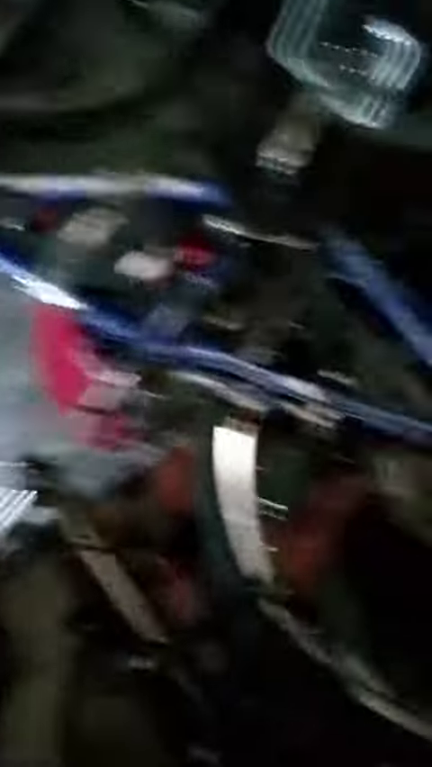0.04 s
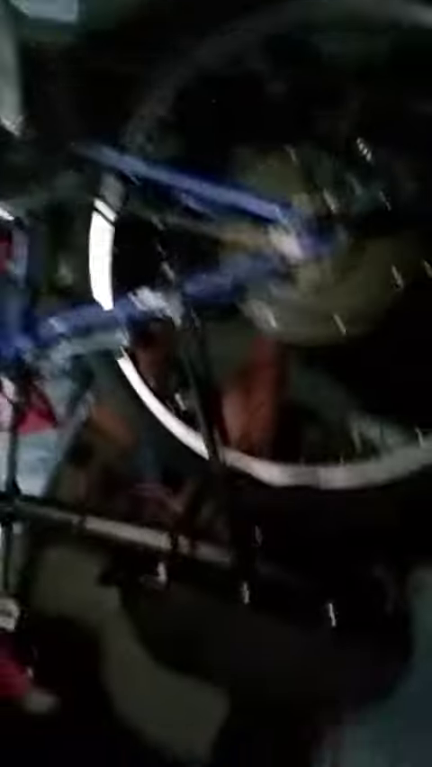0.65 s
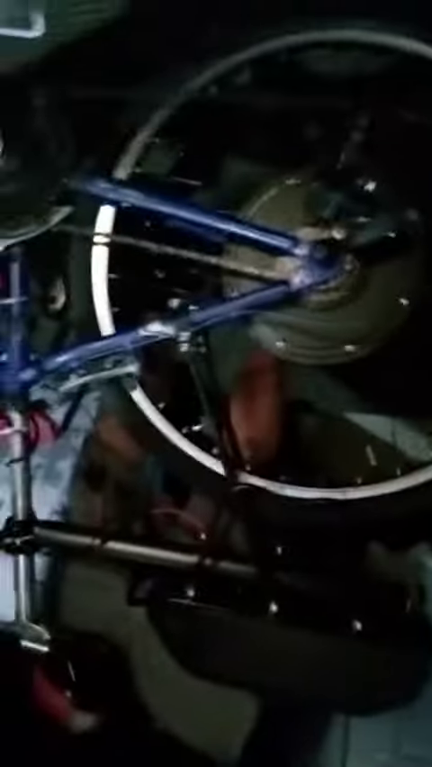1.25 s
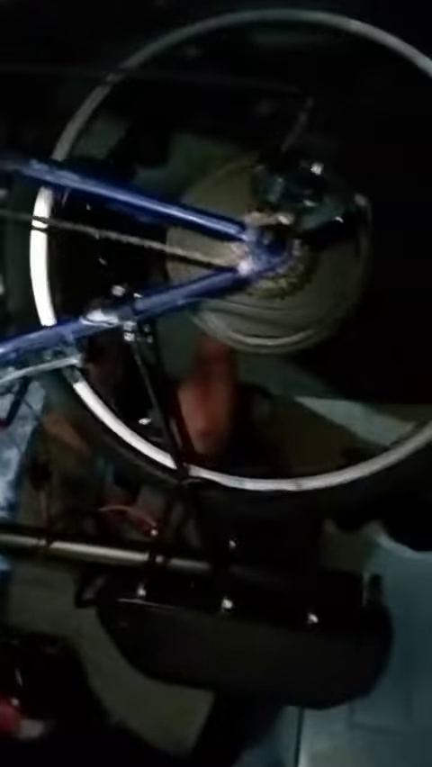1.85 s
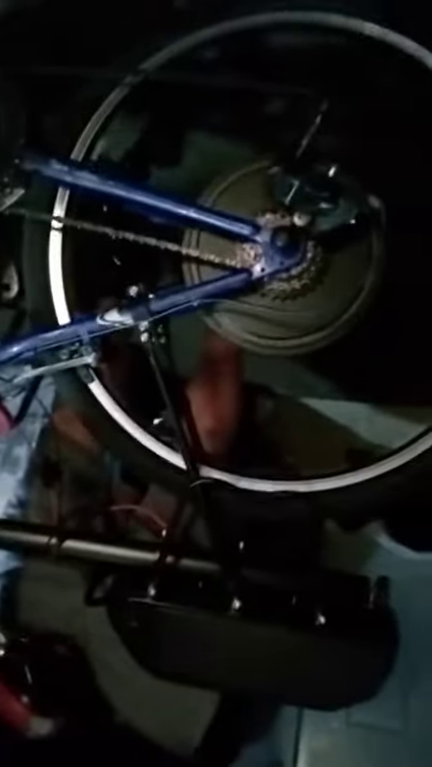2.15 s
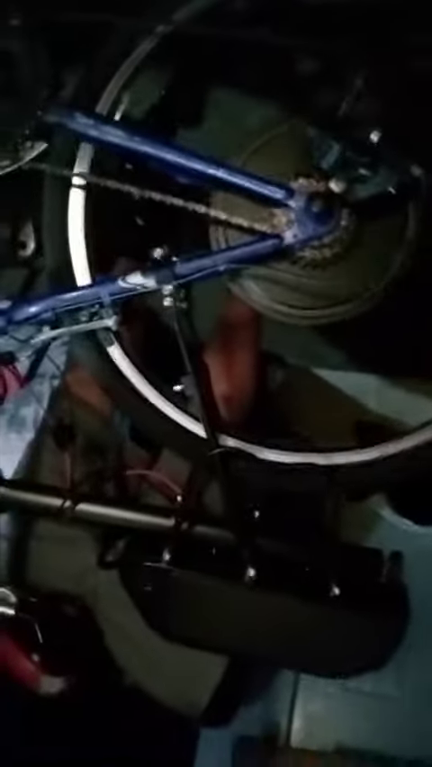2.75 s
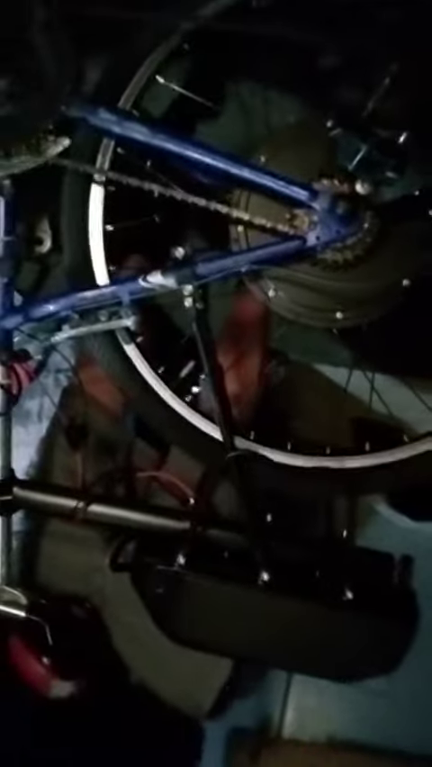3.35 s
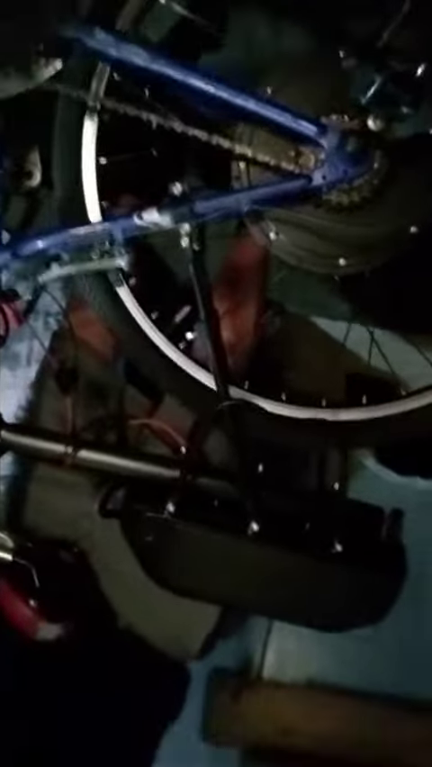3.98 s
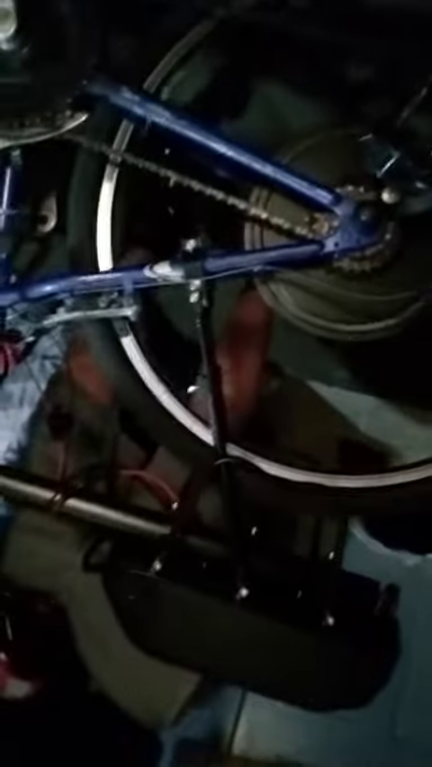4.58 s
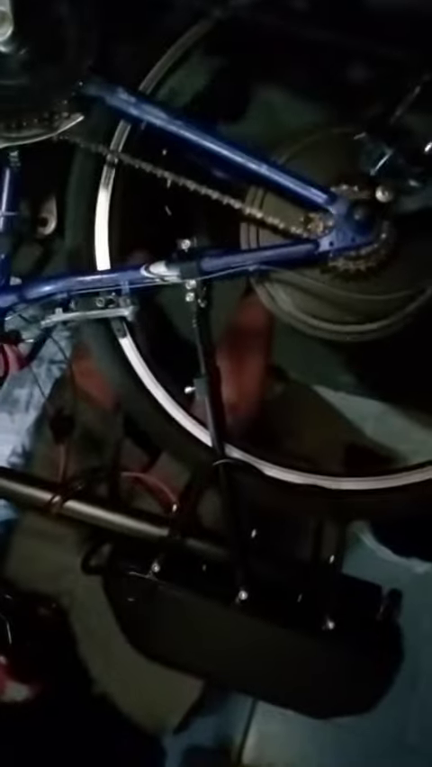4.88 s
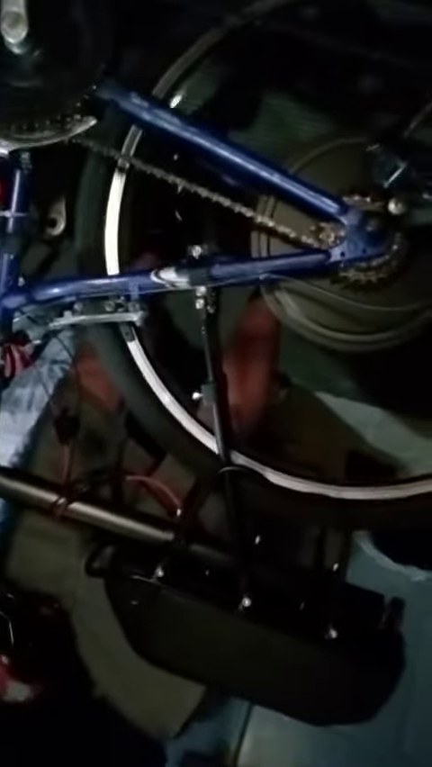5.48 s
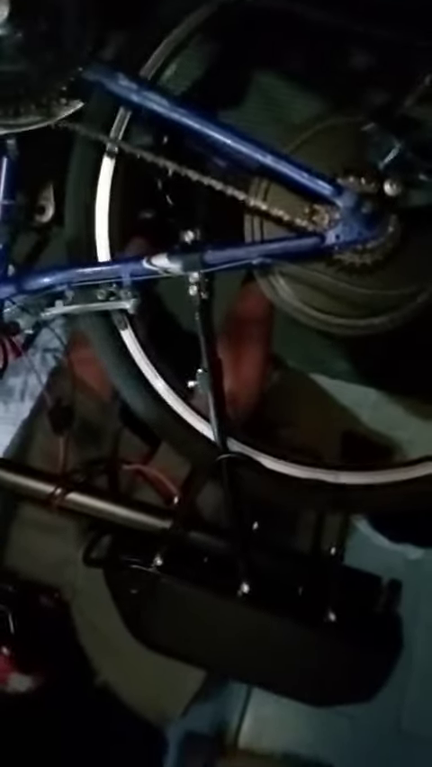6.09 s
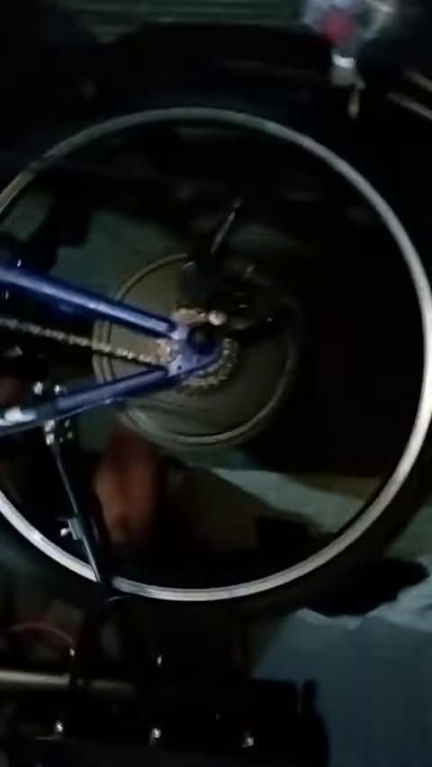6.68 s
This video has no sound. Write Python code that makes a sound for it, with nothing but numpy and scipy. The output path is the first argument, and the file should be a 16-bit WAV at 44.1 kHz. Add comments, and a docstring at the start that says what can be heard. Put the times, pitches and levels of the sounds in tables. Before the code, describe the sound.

A bicycle's geared hub motor is heard close up in a small room. It opens with quiet room tone, faint rustling and a sharp click at 0.5 seconds. Around 1.6 seconds a low hum and a very faint high whistle begin, and gear teeth tick one by one. By 1.9 seconds they merge into a loud, harsh, ringing metallic rattle over a light rumble. It speeds up until 2.3 seconds, then slows into separate ticks and stops at 3 seconds. A sharp knock with a dull bump follows immediately, then small clicks between 3.6 and 4.1 seconds. At 4.5 seconds the hum and ticking return, building into the same rattling drone, faster this time. It holds from about 4.9 to 5.8 seconds, then gradually slows, still rattling at the end, near 6.7 seconds.

```python
"""Small room: a bicycle's geared hub motor, wheel off the ground, is run up twice.
Gear teeth strike one by one, then merge into a harsh rattling drone that rings in hub shell and spokes.
Torque changes set the frame humming; the controller whistles faintly under power.
Handling adds clicks, dull bumps and a faint rustle over the room tone."""
import sys
import numpy as np
from scipy import signal
from scipy.fft import rfft, irfft
from scipy.io import wavfile

SR = 44100
rng = np.random.default_rng(int(sys.argv[2]) if len(sys.argv) > 2 else 0)


def wav_record(signal):
    """Record a signal, one row per channel, as 16-bit PCM in the file named by sys.argv[1]."""
    frames = np.transpose(np.atleast_2d(signal))
    bounded = np.clip(frames, -1, 1)
    # unit amplitude maps onto the largest positive 16-bit level
    quanta = np.round(bounded * 32767).astype(np.int16)
    wavfile.write(sys.argv[1], SR, quanta)


N = 296793
TIME_S = np.arange(N) / SR
RUN_SPLIT_S = 3.7   # between the two runs

# tooth rate, one table per run: time_s, rate_hz
TOOTH_RATE = [
    [(1.894, 90), (1.96, 93), (2.05, 105.4), (2.15, 133), (2.24, 147), (2.32, 144), (2.5, 137), (2.68, 118),
     (2.84, 106), (2.918, 95)],
    [(4.686, 95.5), (4.75, 113), (4.83, 148), (4.91, 180), (5.03, 179), (5.25, 188), (5.84, 193),
     (5.95, 175), (6.1, 156), (6.4, 139), (6.73, 118.6)],
]
# tooth force, one table per run: time_s, rattle_db, tick_db
TOOTH_FORCE = [
    [(1.89, -23, -22), (1.97, -17, -21.5), (2.05, -20, -22), (2.15, -15.5, -21), (2.26, -18.5, -19.5),
     (2.33, -20, -21.5), (2.48, -16.5, -19), (2.6, -24, -21.5), (2.75, -18.5, -21.5), (2.82, -21, -23.5),
     (2.88, -17, -18.5), (2.92, -19.5, -26)],
    [(4.68, -16.5, -19.5), (4.72, -16.5, -27), (4.78, -19, -22.5), (4.9, -17, -23), (5.18, -17, -21),
     (5.44, -18, -22), (5.64, -16, -22), (5.8, -18.5, -22), (5.9, -17, -22), (6.15, -17.5, -22.5),
     (6.45, -19, -21.5), (6.73, -18.5, -21)],
]
# single strikes as the wheel starts and stops: start_s, tick_db, rattle_db
SLOW_STRIKES = [(1.703, -3, -31), (1.7402, -5.5, -29.5), (1.767, -5, -21), (1.7911, -10, -20.5),
                (1.8074, -10, -18), (1.8236, -9, -19.5), (1.8401, -4.5, -23), (1.8533, -6, -16),
                (1.8685, -3, -14), (1.8811, -12, -15.5), (2.9232, -8.5, -26), (2.9346, -10, -16),
                (2.9482, -12.5, -18.5), (2.9612, -14, -15.5), (2.9769, -7.5, -31), (2.9939, -7, -33),
                (3.0199, -5.5, -29), (4.5052, -7, -31), (4.5463, -7, -27.5), (4.5691, -11, -24),
                (4.5905, -7, -20), (4.6076, -9, -22.5), (4.6236, -10.5, -20), (4.6388, -10, -24.5),
                (4.6507, -9.5, -22), (4.6637, -12, -18.5), (4.6749, -9, -17)]
# dull wheel and spoke resonances: pitch_hz, width_hz, run1_db, run2_db
WHEEL_MODES = [(379, 47, -20.5, -24), (497, 140, -19.5, -20.5), (659, 210, -15.5, -16),
               (838, 69, -10.5, -10.5), (902.7, 48, -5, -8), (1027, 200, -8, -6), (1133.5, 150, -1.5, -1.5),
               (1271, 200, -2, -3), (1510, 420, -3, -2.5), (1779, 145, -2, -0.5), (1910, 150, -5.5, -4.5),
               (2157, 440, -6, -4.5), (2530, 680, -15.5, -11), (3110, 920, -11, -9.5)]
# bright hub shell resonances: pitch_hz, width_hz, run1_db, run2_db
SHELL_MODES = [(2040, 1500, -8, -9), (3608, 170, -3, 1), (3745, 170, -5.5, -4.5), (4044, 280, -15, -13),
               (4920, 2100, -17, -15), (6634, 480, -6.5, -9), (6950, 220, -8, -6), (8310, 200, -4.5, -2.5),
               (8664, 202, 2.5, -1.5), (8470, 3000, -8, -8), (9720, 900, -16.5, -16),
               (10210, 120, -23, -20.5), (12720, 580, -3.5, -8.5), (13980, 420, -8.5, -5),
               (14750, 800, 0.5, -1.5), (15550, 180, -10.5, -4)]
# wheel rumble spectrum: freq_hz, density_db
RUMBLE_SPECTRUM = [(30, -15.5), (70, -13), (170, -0.5), (300, 5.5), (600, 6.5), (900, -23.5)]
# lowest frame mode, shaken by torque: time_s, level_db
FRAME_HUM = [(0, -75), (1.60, -71), (1.65, -52), (1.665, -41), (1.8, -39), (1.9, -48.5), (2.1, -52),
             (2.25, -65), (2.5, -83), (3.02, -67), (3.08, -45), (3.2, -57.5), (3.5, -76.5), (4.44, -84),
             (4.485, -37), (4.53, -35.5), (4.6, -48), (4.7, -55.5), (5.2, -53), (5.8, -64.5), (6.0, -71),
             (6.73, -63.5)]
# frame bumps: start_s, level_db, pitch_hz, width_hz, t60_s
FRAME_BUMPS = [(0.451, -47, 248, 200, 0.23), (0.615, -56, 227, 60, 0.62), (1.659, -46, 200, 170, .3),
               (3.071, -35, 87.5, 50, 0.12), (4.482, -44, 115, 70, 0.15), (5.87, -53, 100, 120.1, .12)]
# knocks of small parts: start_s, low_db, mid_db, high_db, top_db, t60_s, ring_hz
KNOCKS = [(0.133, -72, -62, -54, -49, 0.017, 14200), (0.519, -69, -33.5, -26, -25, 0.025, 4600),
          (0.646, -78, -63, -44, -41, 0.018, 13500), (1.279, -69, -64, -56, -60, .04, 6500),
          (1.659, -52.5, -37, -56, -54, 0.034, 1720), (3.069, -30, -24.5, -20.5, -37, 0.066, 1970),
          (3.143, -66, -54, -45, -64, .06, 4960), (3.641, -68, -42, -38, -57, .06, 4800),
          (3.666, -58, -38.5, -37.5, -56, 0.06, 1880), (3.706, -45, -41, -36.5, -50, .04, 4340),
          (3.72, -47.5, -46.5, -47, -64, 0.074, 560), (3.955, -55, -27.5, -28.5, -34, .026, 1380),
          (3.973, -58, -50, -51, -56, 0.064, 590), (4.084, -70, -55.5, -54, -62, .06, 2200),
          (4.424, -70, -52, -41, -42, .03, 8400), (4.454, -67, -40.5, -37, -47, 0.078, 14500)]
# limits of the low, mid, high and top bands: edge_hz
KNOCK_EDGES_HZ = [350, 1100, 3000, 8500, 16000]
# controller whistle envelope: time_s, level_db
WHISTLE_LEVEL = [(1.59, -100), (1.605, -51), (1.70, -46), (1.8, -50), (3.0, -55), (3.06, -100),
                 (4.42, -100), (4.455, -51), (4.55, -49), (6.73, -55)]
# rustle envelope: time_s, level_db
RUSTLE_LEVEL = [(0, -53.5), (.3, -57), (.43, -54), (.46, -46), (.485, -48), (.51, -56.5), (.6, -56.5),
                (.88, -54.5), (1.0, -59.5), (1.25, -66), (1.45, -60.5), (1.58, -59.5), (1.62, -54),
                (3.1, -69), (3.25, -60.5), (3.5, -64), (3.62, -60.5), (3.8, -57.5), (4.03, -53.5),
                (4.15, -56), (4.23, -62), (4.4, -55), (6.73, -51)]
# rustle spectrum: freq_hz, density_db
RUSTLE_SPECTRUM = [(400, -19.5), (800, -21.5), (1200, -14.5), (1750, -8.5), (2000, -7.5), (2300, -2.5),
                   (2900, -8.5), (4000, -10), (5200, -14), (6800, -10), (8500, -15), (11000, -21.5),
                   (13500, -17.5), (15500, -16.5)]
# room tone spectrum: freq_hz, density_db
ROOM_SPECTRUM = [(30, -9.5), (70, -6.5), (117, 0), (175, -9), (235, 5.5), (310, -15.5), (420, -13.5),
                 (600, -18.5), (780, -15), (910, -10), (990, -20.5), (2400, -11), (4500, -24.5),
                 (11000, -24.5), (15000, -18.5)]


def gears(lag_s, lag_spread_s):
    """Each tooth ticks on the shell, then rattles the wheel across the gears' play."""
    start_s, rattle_db, tick_db = tooth_strikes(
        jitter_s=.00025, uneven_db=0.5, slow_tick_db=-13.0, slow_rattle_db=-2.0)
    late_s = start_s + lag_s + lag_spread_s * rng.random(len(start_s))
    tick = from_db(4.0) * ring(SHELL_MODES, start_s, tick_db, contact_t60_s=0.0095, scatter_db=2.0)
    rattle = from_db(0.5) * ring(WHEEL_MODES, late_s, rattle_db, contact_t60_s=0.018, scatter_db=2.0)
    return tick, rattle


def tooth_strikes(jitter_s, uneven_db, slow_tick_db, slow_rattle_db):
    """All strikes, slow and spinning: start_s, rattle_db, tick_db."""
    start_s, tick_db, rattle_db = np.transpose(SLOW_STRIKES)
    strikes = [np.array([start_s, rattle_db + slow_rattle_db, tick_db + slow_tick_db])]
    for run, force in zip(TOOTH_RATE, TOOTH_FORCE):
        time_s, teeth = teeth_passed(run)
        start_s = np.interp(np.arange(teeth[-1]), teeth, time_s)
        start_s += jitter_s * rng.standard_normal(len(start_s))
        share_db = -10 * np.log10(curves(run, start_s)[0] / 100)   # faster teeth, less energy each
        share_db += uneven_db * rng.standard_normal(len(start_s))
        rattle_db, tick_db = curves(force, start_s)
        strikes.append(np.array([start_s, rattle_db + share_db, tick_db + share_db]))
    return np.hstack(strikes)


def teeth_passed(run):
    """Tooth rate integrated over one run: time_s, tooth count."""
    time_s = TIME_S[(TIME_S >= run[0][0]) & (TIME_S <= run[-1][0])]
    return time_s, np.cumsum(curves(run, time_s)[0]) / SR


def ring(modes, start_s, level_db, contact_t60_s, scatter_db):
    """Each strike grinds briefly on each resonance, at a strength of its own."""
    out = np.zeros(N)
    for pitch_hz, width_hz, run1_db, run2_db in modes:
        strike_db = level_db + np.where(start_s < RUN_SPLIT_S, run1_db, run2_db)
        strike_db += scatter_db * rng.standard_normal(len(start_s))
        force = bursts(start_s, strike_db, contact_t60_s) * rng.standard_normal(N)
        out += mode(force, pitch_hz, width_hz)
    return out


def cogging(level_db, decay_s):
    """Torque ripples twice a tooth, most under load at the start of a run."""
    ripple = np.zeros(N)
    for run in TOOTH_RATE:
        time_s, teeth = teeth_passed(run)
        load = np.exp(-(time_s - time_s[0]) / decay_s)
        ripple += np.interp(TIME_S, time_s, load * np.sin(4 * np.pi * teeth), left=0, right=0)
    return from_db(level_db) * ripple


def wheel_rumble(level_db):
    """Low noise while the wheel spins."""
    spinning = np.zeros(N)
    for run in TOOTH_RATE:
        start_s, end_s = run[0][0], run[-1][0]
        spinning += np.interp(TIME_S, [start_s - .25, start_s - .1, end_s + .17, end_s + .23], [0, 1, 1, 0])
    return from_db(level_db) * spinning * coloured_noise(RUMBLE_SPECTRUM)


def frame(hum_hz, waver, roughness):
    """The frame hums unsteadily at its lowest mode and thuds when bumped."""
    pitch_hz = hum_hz * (1 + waver * slow_noise(cutoff_hz=9))
    tone = np.sqrt(2) * np.sin(2 * np.pi * np.cumsum(pitch_hz) / SR)
    grain = mode(rng.standard_normal(N), hum_hz, width_hz=60)
    out = from_db(curves(FRAME_HUM)[0]) * unit_rms(tone + roughness * grain)
    for start_s, level_db, bump_hz, width_hz, t60_s in FRAME_BUMPS:
        out += mode(bursts([start_s], [level_db], t60_s) * rng.standard_normal(N), bump_hz, width_hz)
    return out


def knocks(gain_db, ring_db, ring_q):
    """Small parts clack: a broad snap plus the part's own resonance."""
    out = np.zeros(N)
    bands = [unit_rms(butter(rng.standard_normal(N), edges_hz, "band", order=3))
             for edges_hz in zip(KNOCK_EDGES_HZ, KNOCK_EDGES_HZ[1:])]
    for start_s, *bands_db, t60_s, ring_hz in KNOCKS:
        envelope = bursts([start_s], [0], t60_s)
        snap = envelope * (from_db(bands_db) @ bands)
        ringing = mode(envelope * rng.standard_normal(N), ring_hz, ring_hz / ring_q)
        out += snap + from_db(max(bands_db) + ring_db) * ringing
    return from_db(gain_db) * out


def controller(pitch_hz, width_hz):
    """Switching whistle while power is on."""
    return from_db(curves(WHISTLE_LEVEL)[0]) * resonator(rng.standard_normal(N), pitch_hz, width_hz)


def handling(flutter_db):
    """Cloth rubs unevenly as the hand moves."""
    level_db = curves(RUSTLE_LEVEL)[0] + flutter_db * slow_noise(cutoff_hz=18)
    return from_db(level_db) * coloured_noise(RUSTLE_SPECTRUM)


def turning_reflections(x, turn_hz, paths=4):
    """The turning wheel beams sound along one echo path after another; constant rate throughout."""
    out = np.zeros(N)
    for k in range(paths):
        facing = np.maximum(np.cos(2 * np.pi * (turn_hz * TIME_S - k / paths)), 0)
        out += facing * reflections(x, low_t60_s=0.26, high_t60_s=0.2, split_hz=5100)
    return out


def reflections(x, low_t60_s, high_t60_s, split_hz):
    """Diffuse echoes off near walls; treble dies first."""
    time_s = TIME_S[:SR // 2]
    low = butter(rng.standard_normal(len(time_s)), split_hz, "low") * from_db(-60 * time_s / low_t60_s)
    high = butter(rng.standard_normal(len(time_s)), split_hz, "high") * from_db(-60 * time_s / high_t60_s)
    echoes = (low + high) * (time_s > .003)
    return signal.fftconvolve(x, echoes / np.sqrt(np.sum(echoes ** 2)))[:N]


def room_tone(level_db):
    """Steady, mostly low background noise."""
    return from_db(level_db) * coloured_noise(ROOM_SPECTRUM)


def bursts(start_s, level_db, t60_s):
    """Contact envelope: instant rise, exponential decay; powers add."""
    power = np.zeros(N)
    onsets = np.clip((np.asarray(start_s) * SR).astype(int), 0, N - 1)
    np.add.at(power, onsets, from_db(level_db) ** 2)
    pole = from_db(-60 / (t60_s * SR)) ** 2
    return np.sqrt(signal.lfilter([1], [1, -pole], power + 1e-18))


def mode(force, pitch_hz, width_hz):
    """Two like resonators in series, for deep valleys between modes."""
    once = resonator(force, pitch_hz, width_hz)
    return resonator(once, pitch_hz, width_hz) * np.sqrt(2 * np.pi * width_hz / SR)


def resonator(force, pitch_hz, width_hz):
    """One resonance; white noise keeps its rms."""
    radius = np.exp(-np.pi * width_hz / SR)
    feedback = [1, -2 * radius * np.cos(2 * np.pi * pitch_hz / SR), radius ** 2]
    return np.sqrt((1 - radius ** 2) / 2) * signal.lfilter([1, 0, -1], feedback, force)


def coloured_noise(spectrum):
    """Unit-rms noise of the given spectrum."""
    freq_hz, density_db = np.transpose(spectrum)
    log_bins = np.log(np.fft.rfftfreq(N, 1 / SR) + 1)
    gain = from_db(np.interp(log_bins, np.log(freq_hz), density_db))
    return unit_rms(irfft(rfft(rng.standard_normal(N)) * gain, N))


def slow_noise(cutoff_hz):
    """Unit-rms random drift."""
    return unit_rms(butter(rng.standard_normal(N), cutoff_hz, "low"))


def butter(x, edge_hz, kind, order=2):
    """Causal Butterworth filter."""
    sections = signal.butter(order, np.clip(edge_hz, 10, .47 * SR), kind, fs=SR, output="sos")
    return signal.sosfilt(sections, x)


def curves(rows, at_s=TIME_S):
    """A table's value columns, interpolated in time."""
    time_s, *columns = np.transpose(rows)
    return [np.interp(at_s, time_s, column) for column in columns]


def unit_rms(x):
    """Scale to rms 1."""
    return x / np.sqrt(np.mean(x ** 2) + 1e-20)


def from_db(db):
    """Decibels to gain."""
    return 10 ** (np.asarray(db) / 20)


def scene():
    """Motor, frame and handling in the room; mono."""
    tick, rattle = gears(lag_s=.001, lag_spread_s=.002)
    clacks = knocks(gain_db=0.5, ring_db=-2.0, ring_q=4.5)
    send = from_db(-6.0) * tick + from_db(-5.5) * rattle + from_db(-8.5) * clacks
    walls = turning_reflections(send, turn_hz=2.3)
    lows = frame(hum_hz=117.5, waver=.02, roughness=0.66)
    lows += cogging(level_db=-45, decay_s=0.28) + wheel_rumble(level_db=-49)
    whistle = controller(pitch_hz=15650, width_hz=25)
    air = room_tone(level_db=-64.5)
    rustle = handling(flutter_db=1.5)
    return (tick + rattle + clacks + walls + lows + whistle + rustle + air)[None]


def record(dry):
    """Soft clip, then steep low-pass."""
    ceiling, cutoff_hz = 1.7, 15720
    lowpass = signal.ellip(12, .1, 90, cutoff_hz, fs=SR, output="sos")
    return signal.sosfilt(lowpass, ceiling * np.tanh(dry / ceiling))


dry = scene()
out = record(dry)
wav_record(out)
```